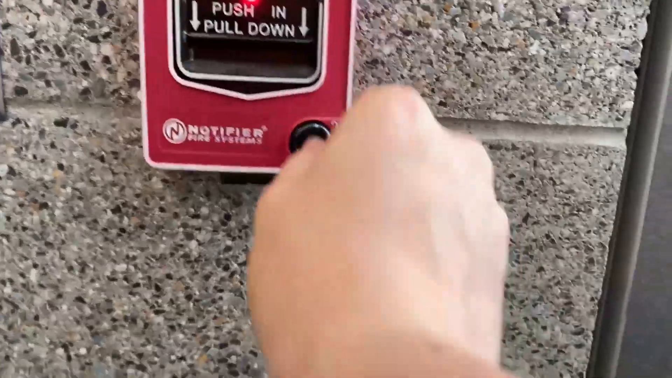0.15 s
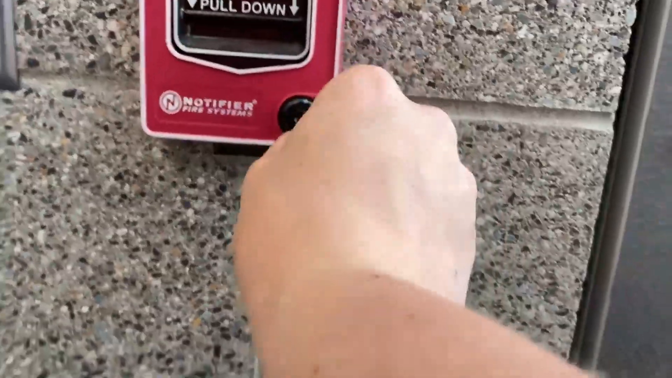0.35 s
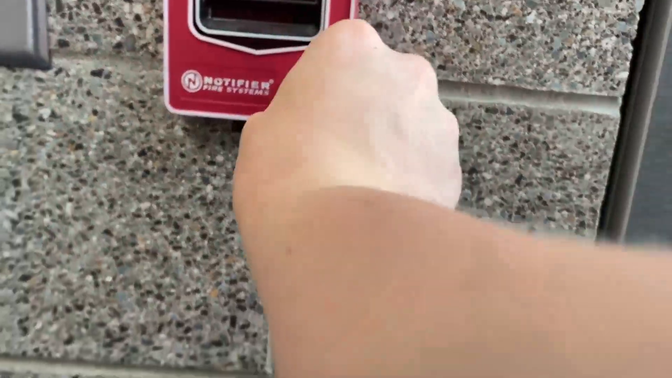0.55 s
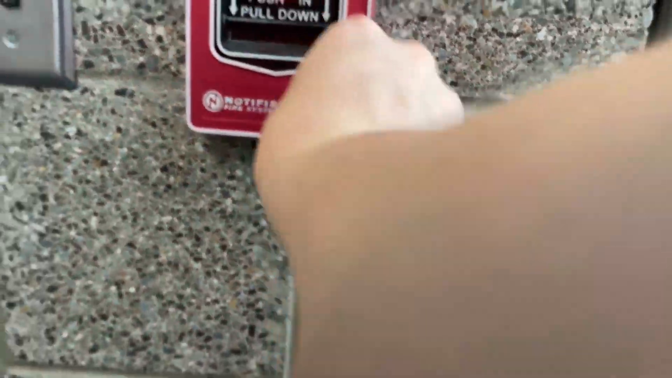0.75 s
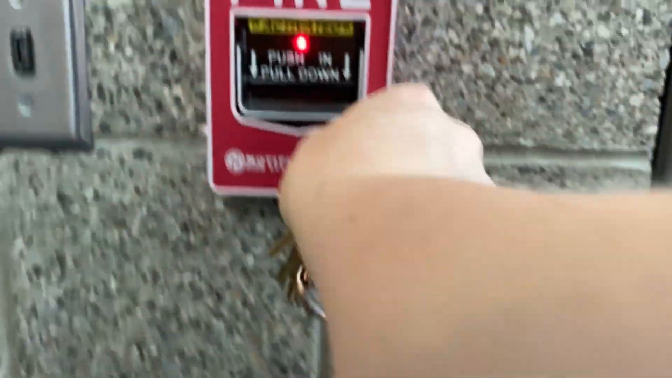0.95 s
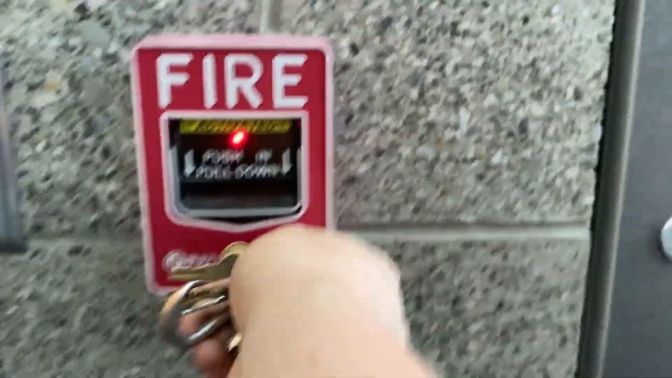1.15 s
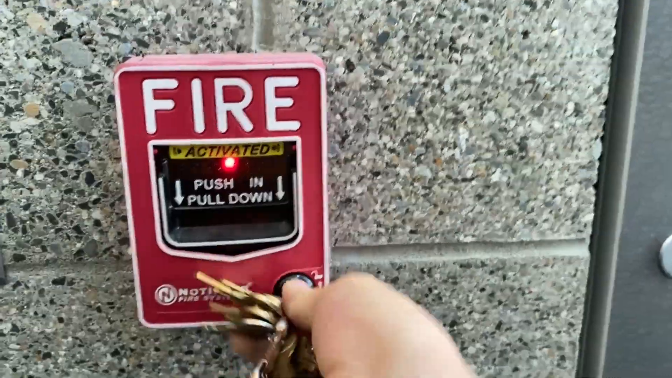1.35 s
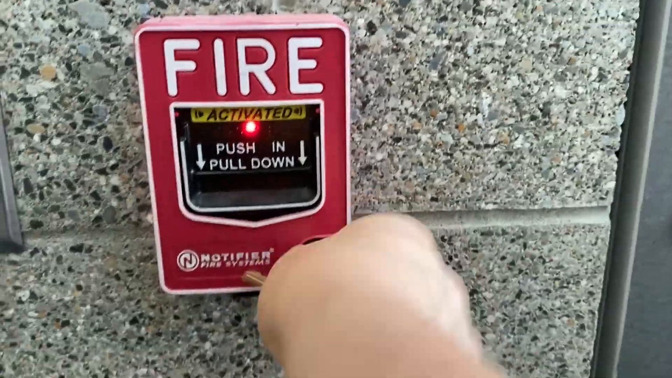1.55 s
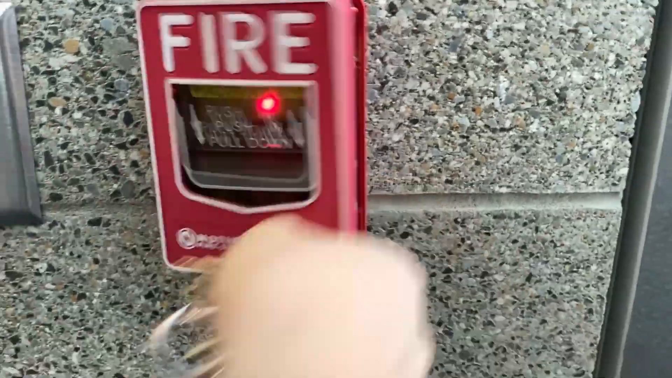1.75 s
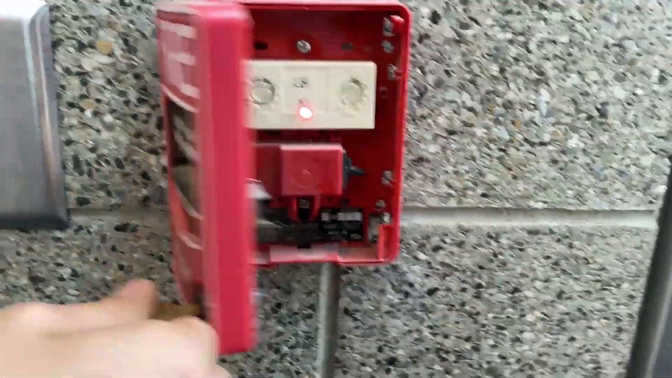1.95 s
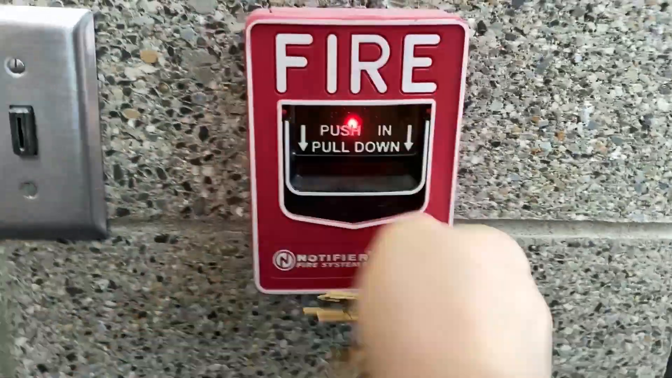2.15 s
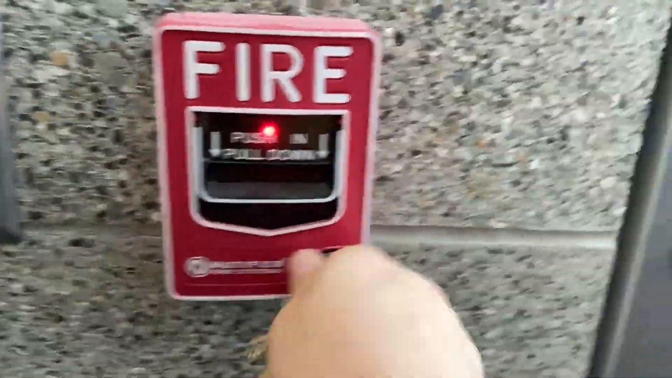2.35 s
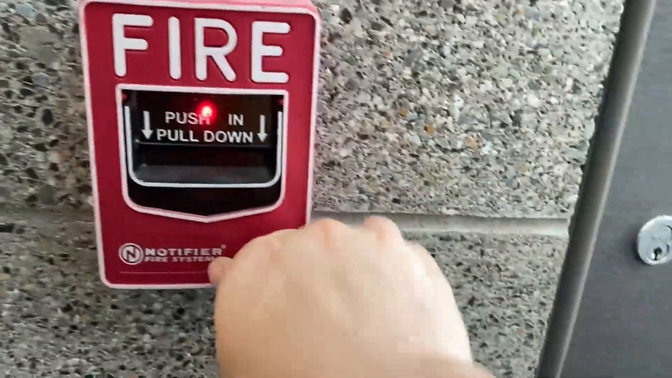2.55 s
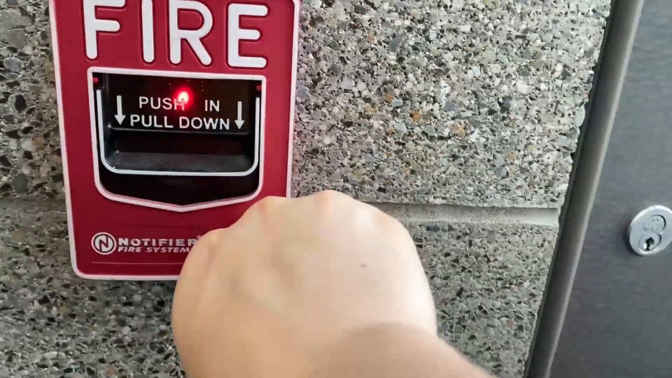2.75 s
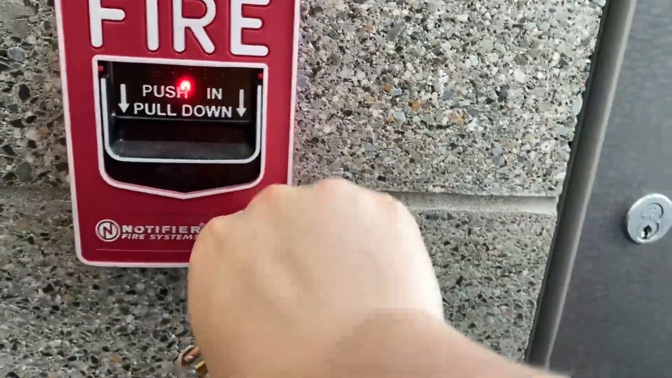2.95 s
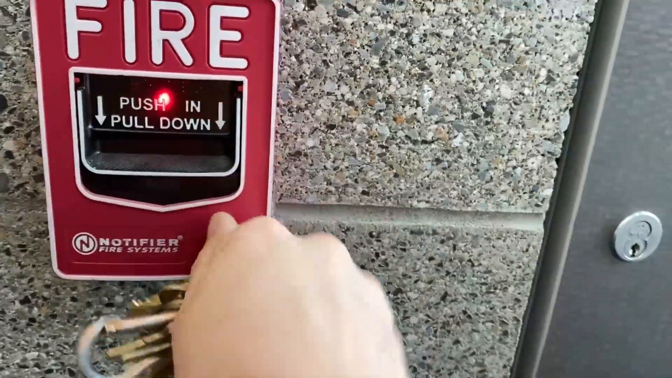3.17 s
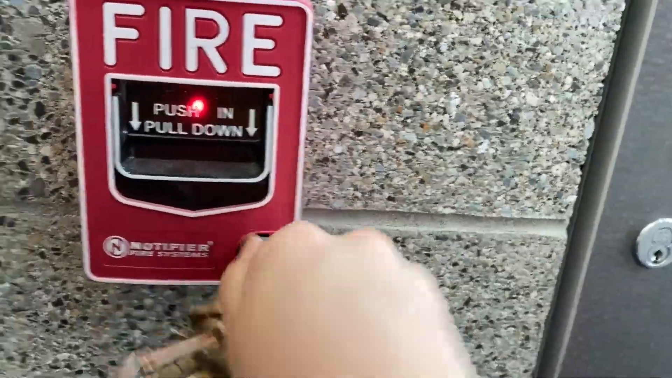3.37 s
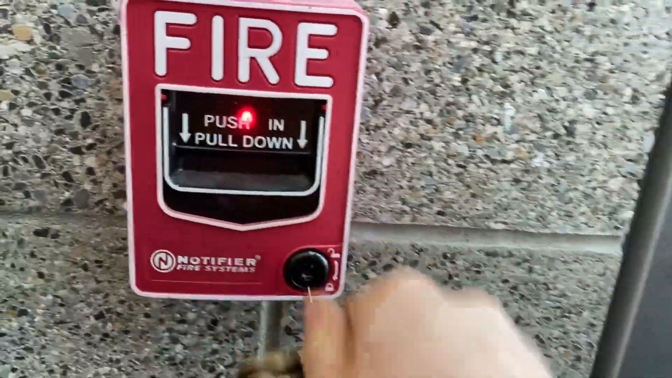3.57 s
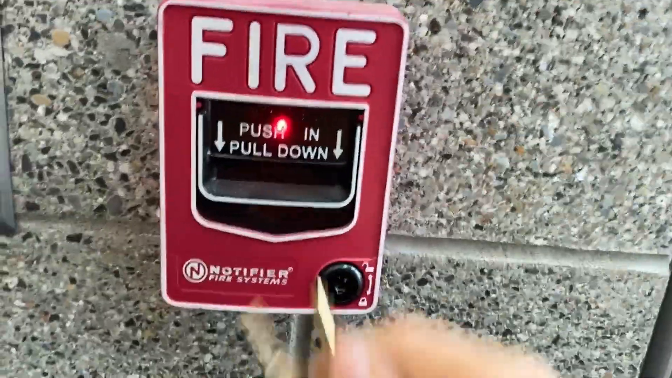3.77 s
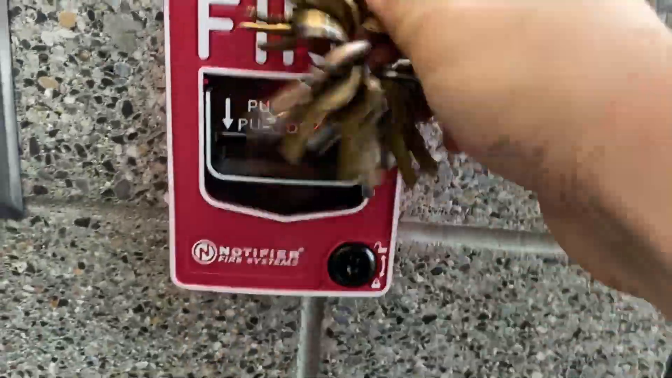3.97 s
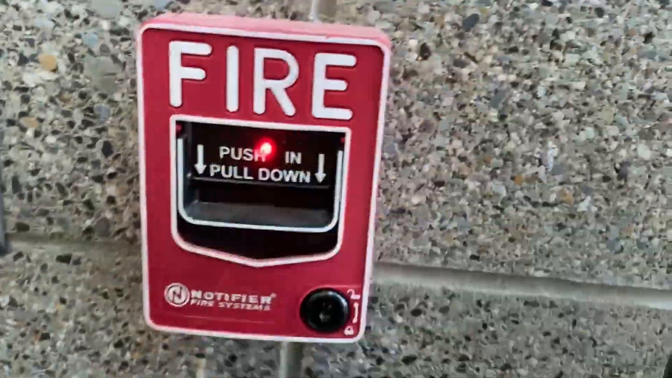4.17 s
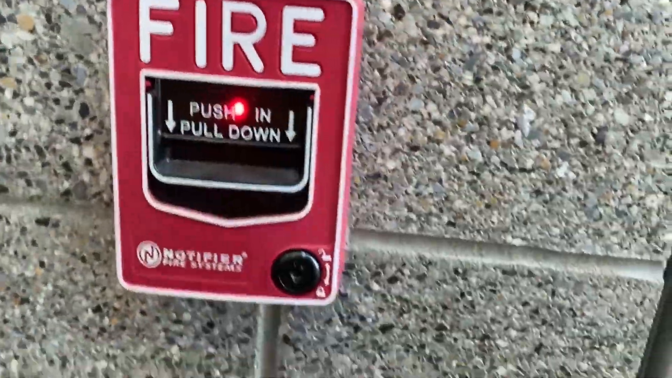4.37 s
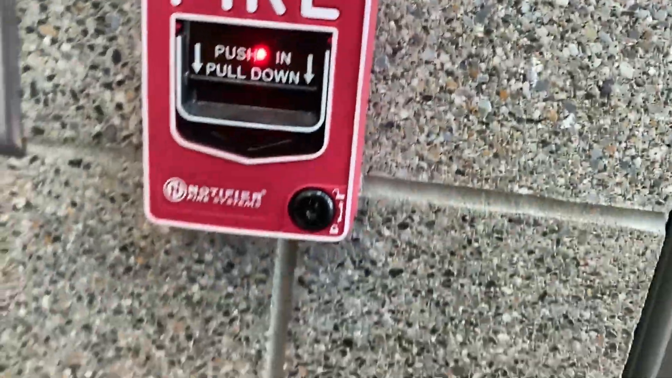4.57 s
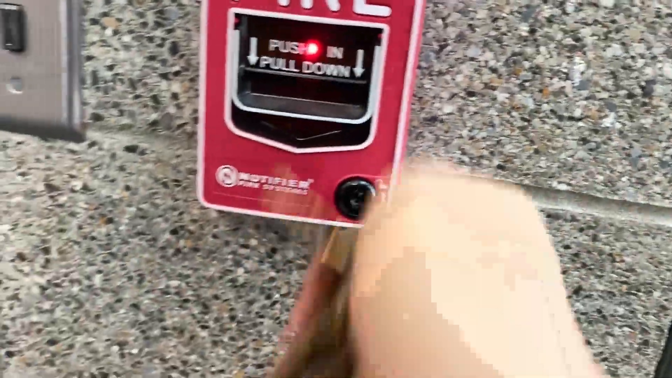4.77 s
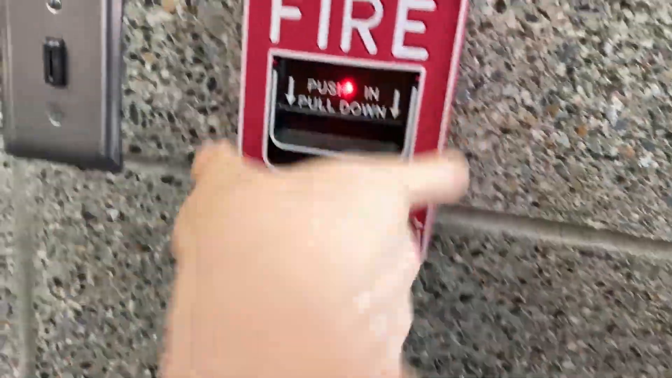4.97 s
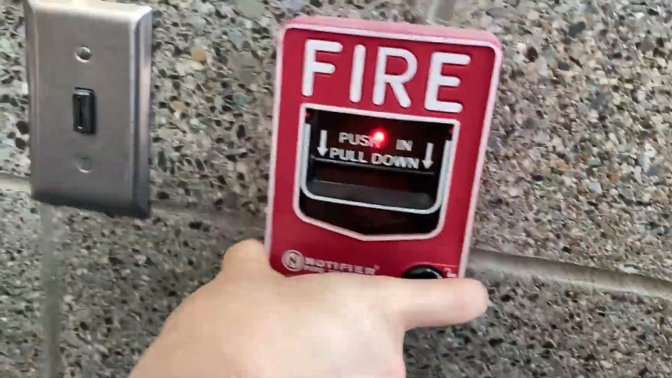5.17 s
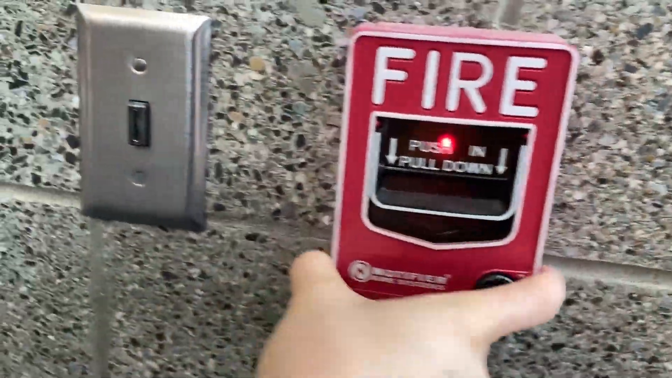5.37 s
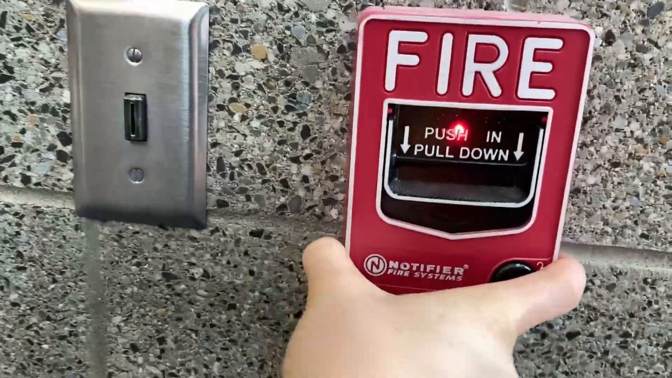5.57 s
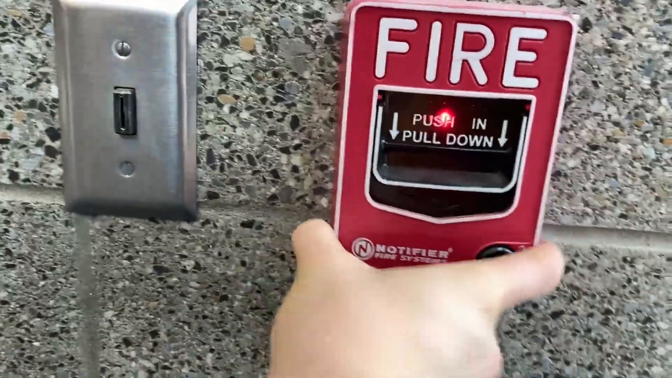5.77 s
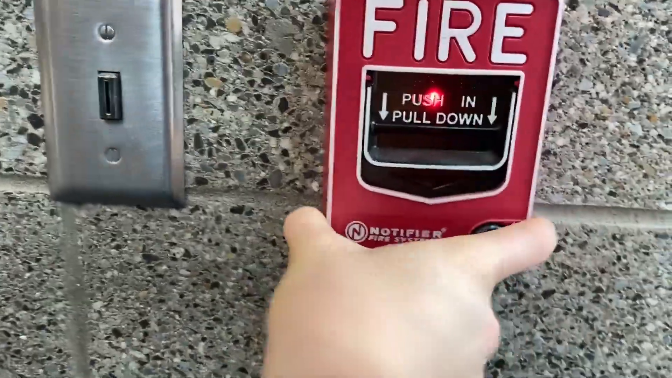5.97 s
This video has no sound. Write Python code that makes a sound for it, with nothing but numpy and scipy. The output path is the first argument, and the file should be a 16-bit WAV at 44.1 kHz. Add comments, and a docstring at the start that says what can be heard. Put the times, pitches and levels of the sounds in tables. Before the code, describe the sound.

A low, soft ventilation rumble with a faint mains hum runs throughout, in a hard-walled hallway whose echo is slight because the microphone is very close. From 0 to 0.6 s there are small hollow knocks on a plastic wall box, then a firm clack with a bright key clink near 0.7 s. From 1.1 to 1.6 s keys jingle and tick in the lock. A strong cluster of rattling clacks at 1.75 s opens the cover; a sharp snap with clinking at 2.12 s shuts it, with a smaller knock at 2.25 s. After a quieter gap, hard clacks come at 2.95 to 3.08 s, the loudest last, and a duller one at 3.4 s. Light loose jingling follows, with a bright double clack at 3.96 to 4.01 s, thinning by 4.4 s. At 5.07 s a brief palm slide squeaks softly, then sparse faint taps and ticks continue until 6 s.

```python
"""Ventilation rumbles throughout. After a few knocks on a small plastic wall box, a hand works a bunch of keys in its
lock, then opens and shuts its cover; at last the palm slides onto the cover and presses it. By contact mechanics each
touch is a short rattle of tiny impacts: it excites the box's modes, hollow near 1-2 kHz, and clinks among the keys
in the treble. A hard-walled hallway answers, by delays fed back; two microphone ports a little apart receive it."""
import sys
import numpy as np
from scipy import signal
from scipy.fft import rfft, irfft, next_fast_len
from scipy.io import wavfile

SR = 44100
rng = np.random.default_rng(int(sys.argv[2]) if len(sys.argv) > 2 else 0)


def bounce(signal):
    """Save signal as a 16-bit WAV file at the path given by the first command-line argument."""
    frames = np.transpose(np.atleast_2d(signal))
    limited = np.clip(frames, -1, 1)
    pcm = np.round(limited * 32767).astype(np.int16)
    wavfile.write(sys.argv[1], SR, pcm)


def natural_amplitude(level_db):
    """Convert a level in decibels to a linear amplitude factor, elementwise."""
    exponent = np.asarray(level_db, float) / 20
    return 10 ** exponent


N = 265305
LEAD = 1024   # samples from the start of a rattle to its height
HZ = np.fft.rfftfreq(N, 1 / SR)


def rms_one(x):
    """Normalisation: scale to rms 1."""
    return x / np.sqrt(np.mean(x ** 2) + 1e-20)


def at_hz(points, hz):
    """Interpolation: read a table on a log-frequency axis."""
    table_hz, values = np.array(points)[:, 0], np.array(points)[:, 1]
    return np.interp(np.log(hz + 1), np.log(table_hz + 1), values)


def colour(x, spectrum):
    """Spectral shaping: filter by a spectrum of mean power 1."""
    return irfft(rfft(x) * rms_one(natural_amplitude(at_hz(spectrum, HZ))), N)


def butter(x, order, hz, kind):
    """Butterworth filtering: a flat pass band."""
    return signal.sosfilt(signal.butter(order, hz, kind, fs=SR, output="sos"), x)


def through(x, response):
    """Linear systems: convolve each channel with an impulse response."""
    return signal.fftconvolve(x, response[None], axes=1)


def drift(rate_hz):
    """Random fluctuation: noise through two equal slow poles, scaled to rms 1."""
    r = np.exp(-2 * np.pi * rate_hz / SR)
    slow = signal.lfilter([1], [1, -2 * r, r * r], rng.standard_normal(N + SR))
    return rms_one(slow[SR:])


def impacts(count, spread_db):
    """Micro-impacts: dense, of uneven size and random sign; rms 1."""
    size_db = spread_db * np.minimum(rng.exponential(1, count), 5)
    return rms_one(rng.standard_normal(count) * natural_amplitude(size_db))


def rattle(swell_ms, fade_ms, spread, uneven_db):
    """Contact of rough bodies: impacts swell, then fade; a share of them is opposite in the two channels."""
    ms = (np.arange(5120) - LEAD) / SR * 1000
    swell = np.exp(-(ms / np.clip(swell_ms, .1, 18)) ** 2)
    fade = np.exp(-ms / max(fade_ms, .3))
    common = impacts(count=5120, spread_db=uneven_db)
    opposite = impacts(count=5120, spread_db=uneven_db) * [[1], [-1]]
    return np.where(ms < 0, swell, fade) * (common + spread * opposite)


def ringing(modes, strength_db, damping):
    """Modal superposition: impulse response of (f/Hz, width/Hz, level/dB) modes, of energy 1; damping scales width."""
    hz, width, db = np.transpose(modes)[:, :, None]
    t = np.arange(8192) / SR
    decay = np.exp(-np.pi * damping * width * t)
    rings = natural_amplitude(db + strength_db) * np.sqrt(width) * decay * np.sin(2 * np.pi * hz * t)
    return rms_one(rings.sum(axis=0)) / np.sqrt(8192)


def add(track, s, sound):
    """Superposition: mix in a sound; tracks have LEAD samples before time 0, so a rattle peaks at s."""
    i = round(s * SR)
    track[:, i:i + sound.shape[-1]] += sound[..., :track.shape[1] - i]


# spectrum of the moving air: f/Hz, relative level per Hz/dB
AIR = [(21, -46.5), (35, 3), (180, 1.5), (778, -20), (2170, -25.5), (12400, -46), (16000, -77)]
# correlation of the air noise in the two channels, clipped to -1..0.86: f/Hz, correlation
AIR_LIKENESS = [(60, 3.05), (380, -0.07), (2380, -2)]
# mains lines: f/Hz, level/dB before their drift and the balance
HUM = [(120, -58)]


def ventilation():
    """Turbulence noise: coloured and partly correlated, alike in the bass, with wavering mains lines."""
    mid, side = rfft(rng.standard_normal((2, N))) * natural_amplitude(at_hz(AIR, HZ))
    alike = np.clip(at_hz(AIR_LIKENESS, HZ), -1, .86)
    air = irfft(np.sqrt(1 + alike) * mid + np.sqrt(1 - alike) * side * [[1], [-1]], N)
    air = natural_amplitude(-45 + 0.4 * drift(2.9)) * rms_one(air)
    t = np.arange(N) / SR
    hum = 0
    for hz, db in HUM:
        level = np.sqrt(2) * natural_amplitude(db + 1.4 * drift(8.4))
        hum = hum + level * np.sin(2 * np.pi * hz * t + 0.54 * drift(3.0))
    return (air + hum) * natural_amplitude([[-.8], [.8]])   # the right is a little louder


def hallway(x):
    """Reverberation: sixteen feedback delays a side, duller on every round."""
    size = next_fast_len(N + SR)
    hz = np.fft.rfftfreq(size, 1 / SR)
    t60_s = 1 / (1 + hz / 5700)   # 1 s in the deep bass, half of it at 5700 Hz
    answer = np.zeros((2, len(hz)), complex)
    for k, lag_s in enumerate(rng.uniform(0.013, 0.063, size=32)):
        loop = natural_amplitude(-60 * lag_s / t60_s) * np.exp(-2j * np.pi * hz * lag_s)
        answer[k % 2] += (-1) ** (k // 2) * loop / (1 - loop)
    return irfft(answer * rfft(x, size), size)[:, :N]


# left port against right: f/Hz, phase/rad
PORT_PHASE = [(60, 0), (1800, 0), (2400, -1.1), (3800, 0), (5200, -.9), (6500, .1), (9300, 3.3),
              (12000, 6.2), (16000, 9.6)]
# left port against right: f/Hz, level/dB
PORT_BALANCE = [(60, 7.5), (180, 2.5), (550, -1), (1650, 3), (4970, -0.5), (15000, 8.5)]


def ports(x):
    """Two-point reception: the ports hear a near source with a phase and level step that depend on pitch."""
    half = natural_amplitude(at_hz(PORT_BALANCE, HZ) / 2) * np.exp(.5j * at_hz(PORT_PHASE, HZ))
    return irfft(rfft(x) * [half, 1 / half], N)


# range of the modes of the many keys: lowest f/Hz, highest f/Hz, narrowest width/Hz, widest width/Hz
KEYS = [6200, 15500, 130, 450]


def some_keys(count):
    """Free modes of metal bodies: whichever keys touch ring at pitches of their own."""
    low_hz, high_hz, narrow_hz, wide_hz = np.log(KEYS)
    modes = np.exp(rng.uniform([low_hz, narrow_hz, 0], [high_hz, wide_hz, 0], (count, 3)))
    return ringing(modes, rng.normal(0, 12.0, (count, 1)), damping=1)


# modes of the cover, also rung by the palm and the blows: f/Hz, width before damping/Hz, relative level/dB
BOX = [(608, 15, -2.5), (986, 46, -15), (1060, 37, -24.5), (1100, 47, -1.5), (1209, 18, 4.5),
       (1290, 192, 13), (1565, 70, 7.5), (1691, 40, 5), (1892, 58, -13), (1915, 300, 12), (2500, 510, 9),
       (3020, 170, 4), (3380, 210, 2), (4010, 200, 1), (4670, 65, -6.5)]
# spectrum of key scraping on key, also of the clinks: f/Hz, relative level per Hz/dB
CLINK = [(2000, -21), (3500, -10.5), (6000, -10.5), (9000, 5), (12000, 1.5), (15000, 6), (16500, -17)]


def fumbling(box_db, keys_db):
    """Friction noise: fingers keep brushing the cover; loose keys keep touching, a new pair each time."""
    rub = impacts(count=N, spread_db=2.5) * natural_amplitude(box_db + 2.5 * drift(28))
    brushed = signal.fftconvolve(rub, ringing(BOX, 0, damping=1.4))[:N]
    jiggle = impacts(count=N, spread_db=7.0) * natural_amplitude(keys_db + 4.5 * drift(25))
    pair = rng.integers(0, 12, N // 256 + 1).repeat(256)[:N]
    tinkle = sum(signal.fftconvolve(jiggle * (pair == k), some_keys(count=6))[:N] for k in range(12))
    return brushed + colour(jiggle, CLINK) + natural_amplitude(9.0) * tinkle


# the palm's slide onto the cover: start t/s, end t/s, level/dB before its drift
SLIDE = (5.066, 5.158, -42.5)
# modes that the palm leaves free: f/Hz
SLIDE_HZ = [580, 1180, 1740, 4700]


def slide():
    """Sliding friction: the palm drags along the cover with a wavering level and sets its modes ringing."""
    start_s, end_s, db = SLIDE
    t = np.arange(N) / SR
    stroke = (t > start_s) * np.clip((end_s - t) / 0.015, 0, 1)
    drag = impacts(count=N, spread_db=2.0) * natural_amplitude(db + 2.1 * drift(33.6)) * stroke
    modes_hz = np.array(BOX)[:, :1]
    favoured_db = sum(18.0 * np.exp(-(np.log2(modes_hz / hz) / 0.081) ** 2) for hz in SLIDE_HZ)
    tilt_db = -10.0 * np.log2(modes_hz / 1200)
    radiated = np.diff(ringing(BOX, favoured_db + tilt_db, damping=1.5))   # the slope holds little bass
    return signal.fftconvolve(drag, radiated / np.linalg.norm(radiated))[:N]


# key on key, at its height: t/s, level/dB, fade/ms
CLINKS = [(0.472, -16.5, 3.4), (0.655, -21.5, 8.3), (0.679, -17.5, 18), (0.696, -8, 1.5), (0.845, -37, 1.5),
          (0.901, -31.5, 2.5), (1.065, -47.5, 15), (1.098, -29, 11), (1.115, -20.5, 4), (1.247, -35.5, 3),
          (1.263, -25.5, 6.9), (1.301, -12.5, 16), (1.33, -40, 3), (1.359, -21, 2.2), (1.376, -30.5, 2.1),
          (1.403, -23, 12), (1.445, -18.5, 5.1), (1.457, -10.5, 5.1), (1.494, -20, 7.5), (1.565, -17, 9.7),
          (1.594, -24, 4), (1.631, -13.5, 2.5), (1.656, -29, 2.2), (1.672, -25.5, 2), (1.712, -30.5, 2.1),
          (1.739, -11.5, 3.5), (1.788, -17, 12), (1.874, -20, 2.6), (2.068, -29.5, 11), (2.118, -5.5, 12.3),
          (2.173, -22, 21), (2.232, -22, 2.8), (2.265, -21, 2.7), (2.404, -28, 15.4), (2.535, -32.5, 36),
          (2.583, -26, 3.2), (2.84, -27.5, 1.7), (2.947, -12, 1.9), (3, -15.5, 2.6), (3.078, -10, 5.7),
          (3.378, -31.5, 32), (3.399, -19, 5.8), (3.449, -28.5, 2), (3.513, -31, 7.7), (3.556, -37, 18),
          (3.587, -36, 35), (3.629, -33.5, 19), (3.663, -27.5, 8.4), (3.673, -32, 18), (3.707, -34, 5),
          (3.764, -32, 3.3), (3.777, -29.5, 14), (3.826, -34.5, 1.9), (3.841, -49.5, 1.6), (3.86, -32, 5.7),
          (3.928, -27, 4.4), (3.957, -20, 30), (3.975, -15.5, 24), (4.004, -24.5, 10), (4.048, -22, 16),
          (4.073, -30, 23), (4.102, -26.5, 2.9), (4.118, -32, 9.5), (4.131, -26, 7.3), (4.185, -32.5, 4.1),
          (4.212, -29, 8.5), (4.234, -35, 23), (4.265, -40, 5), (4.298, -43, 9), (4.341, -35, 9.3),
          (4.353, -19.5, 5.9), (4.365, -29.5, 14.3), (4.564, -41, 37), (4.763, -35, 5.5),
          (4.779, -29.5, 18), (4.805, -24, 0.91), (4.931, -29, 17), (4.954, -40, 33), (5.522, -25, 1.9),
          (5.536, -24.5, 2.2), (5.785, -36, 8.3), (5.875, -25, 3.7), (5.985, -30.5, 2.3)]
# single keys that hang free and ring on: t/s, f/Hz, starting amplitude/dB, 60 dB decay/s
RINGS = [(3.587, 9820, -27, .057), (3.671, 13900, -29, .09), (3.671, 3140, -43, .1),
         (3.776, 4990, -35, .05), (3.792, 13500, -41, .15), (3.858, 8150, -39, .2), (3.858, 12650, -39, .2),
         (3.858, 12050, -41, .22), (3.858, 3660, -44, .08), (4.074, 6560, -31, .045),
         (4.185, 13900, -38, .08), (4.185, 11950, -39, .07), (4.264, 11000, -36, .05),
         (4.048, 3700, -33, .04), (4.353, 12000, -46, .35)]


def keys(treble):
    """Metal impact: each clink is a bright rattle with some ring of the bunch; top treble comes and goes."""
    scratch, rings = np.zeros((2, 2, N + LEAD))
    for s, db, fade_ms in CLINKS:
        # metal on metal starts at once
        clink = natural_amplitude(db) * rattle(swell_ms=1.54, fade_ms=fade_ms, spread=0.12, uneven_db=3.6)
        add(scratch, s, clink)
        add(rings, s, natural_amplitude(-10.0) * through(clink, some_keys(count=9)))
    t = np.arange(16384) / SR
    for s, hz, db, t60_s in RINGS:
        envelope = natural_amplitude(db - 60 * t / t60_s) * (1 - np.exp(-t / 0.00033))
        swing_rad = np.cumsum(rng.normal(0, .05, len(t)))   # swinging, so the tone wavers
        add(rings, s + LEAD / SR, envelope * np.sin(2 * np.pi * hz * t + swing_rad))
    rings = butter(rings, 2, 2500, "high")
    bright = colour(scratch[:, LEAD:], CLINK) + rings[:, LEAD:]
    dull = butter(bright, 2, 8500, "low")
    return dull + np.clip(treble, 0, 1) * (bright - dull)


# thumps of the wall plate under some of the blows, each starting 8 ms ahead of t: t/s, level at the start/dB
THUMPS = [(0.69, -25), (1.762, -28.5), (2.129, -28), (3.008, -26), (3.088, -24.5), (3.426, -28),
          (3.967, -25), (4.015, -26), (5.883, -26)]
# modes of the wall plate: f/Hz, relative level/dB
WALL = [(80, -6.5), (160, -2.5), (190, -2)]
WALL_T60_S = 0.1039


def wall_plate():
    """Inertia: at the times listed a heavy plate is thumped, and its low modes start slowly."""
    plate = np.zeros((2, N + LEAD))
    modes = [(hz, np.log(1000) / (np.pi * WALL_T60_S), db) for hz, db in WALL]
    for s, db in THUMPS:
        sway = ringing(modes, rng.normal(0, 4.0, (len(modes), 1)), damping=1)
        sway *= 1 - np.exp(-np.arange(len(sway)) / (0.003 * SR))
        add(plate, s - .008 + LEAD / SR, natural_amplitude(db) * np.sqrt(2) * sway / abs(sway).max())
    return plate[:, LEAD:]


# blows on the box, at their height: t/s, level/dB, swell/ms (at most 18), fade/ms before scaling, loudest mode f/Hz
KNOCKS = [(0.032, -26.5, 2.4, 16.2, 1350), (0.146, -38, 18, 13, 1760), (0.229, -27, 5.6, 5.9, 1720),
          (0.306, -29.5, 0.83, 2.7, 1290), (0.321, -25, 9.9, 6.2, 1670), (0.346, -32.5, 18, 6.9, 1720),
          (0.417, -34.5, 2.3, 16, 1635), (0.474, -20, 1.2, 9.5, 1990), (.476, -20.5, 2.1, 2.5, 3945),
          (0.496, -22.5, 3, 9.4, 1720), (0.547, -37.5, 2.5, 57, 1244), (.66, -13, 4.7, 13.5, 1596),
          (0.686, -23, 14, 6.6, 1600), (0.698, -17.5, 23, 14, 1657), (0.901, -34, 0.86, 10, 1055),
          (1.115, -36.5, 4.1, 14.4, 1074), (1.255, -34.5, 0.91, 23, 1272), (1.288, -23, 1.3, 7, 1650),
          (1.309, -20, 7, 11, 1071), (1.359, -27, 12, 16, 1750), (1.415, -20, 6.7, 14.4, 1845),
          (1.46, -23, 5.5, 4.8, 1030), (1.495, -28.5, 10.5, 16, 1840), (1.557, -30, 9.6, 27, 1835),
          (1.636, -35, 2.8, 7, 990), (1.705, -30, 2, 18, 1840), (1.737, -13.5, 5.2, 6, 1264),
          (1.744, -13.5, 3, 12, 1510), (1.791, -13, 9.5, 11, 1498), (1.821, -24, 2, 4.6, 1154),
          (1.936, -35.5, 1, 5.9, 2050), (2.115, -16.5, 5.4, 13, 805), (2.125, -12.5, 5.3, 7.6, 1290),
          (2.232, -31.5, 0.84, 9.9, 1280), (2.254, -18, 1.3, 3.7, 1290), (2.268, -29.5, 1.5, 6, 3230),
          (2.27, -20.5, 5.2, 5.8, 1074), (2.284, -32.5, 3.5, 19, 1205), (2.577, -38.5, 19, 8.9, 1980),
          (2.761, -38.5, 1.4, 8.7, 1340), (2.841, -27.5, 1.8, 7.6, 646), (2.896, -36.5, 2.2, 2.4, 1100),
          (2.92, -24.5, 3, 5.8, 1100), (2.95, -19.5, 7.7, 10.6, 1054), (3.0, -17, 0.25, 7.4, 1015),
          (3.073, -9, 1.2, 2.6, 1010), (3.08, -13, 1, 7.4, 1060), (3.207, -37, 17, 11, 1030),
          (3.247, -34.5, 1.9, 21, 1030), (3.302, -32, 1, 4.5, 1100), (3.337, -37, 1.3, 23, 705),
          (3.373, -36, 2.7, 41, 1100), (3.407, -22.5, 12.4, 11.4, 1100), (3.425, -26.5, 6.5, 7.7, 1040),
          (3.502, -36.5, 5.4, 16, 1615), (3.542, -39, 3.1, 5.3, 1020), (3.958, -13, 0.74, 5.6, 1980),
          (3.978, -18, 9.5, 10.7, 990), (4.006, -14.5, 0.68, 9.7, 1625), (5.067, -37.5, 0.65, 3.6, 1740),
          (5.13, -35.5, 3, 11, 1170), (5.248, -51.5, 1.75, 9.4, 940), (5.315, -28.5, 1.8, 6.4, 1060),
          (5.437, -47.5, 5.5, 9, 760), (5.511, -39.5, 1.4, 24, 2070), (5.536, -29, 5.2, 5.8, 1100),
          (5.535, -29.5, 0.76, 3.5, 3790), (5.626, -45, 1.3, 10, 880), (5.692, -43, 0.72, 4.1, 1100),
          (5.776, -34.5, 5.7, 15.6, 1010), (5.793, -38, 4, 3.4, 2700), (5.883, -25.5, 6.4, 7.9, 1860),
          (5.981, -30, 1.8, 17, 850)]
# spectrum of the crack of a blow: f/Hz, relative level per Hz/dB
CRACK = [(1500, -30.5), (2500, 2.5), (4000, 2), (6500, 2), (9000, -8), (16000, -21)]
CRACK_DB, CRACK_PER_DB, MEDIUM_BLOW_DB = -12.5, 0.74, -25   # crack re a medium blow; harder blows crack more
SPOT_FAVOUR_DB = 20   # gain of the modes nearest the struck spot's pitch
SPOT_WIDTH_HZ, SPOT_DB = 80, 10   # the patch of cover under each blow, its level with that gain


def box():
    """Modal excitation: each blow rings the cover's modes and cracks above; some also thump the wall plate."""
    body, crack = np.zeros((2, 2, N + LEAD))
    for s, db, swell_ms, fade_ms, hz in KNOCKS:
        blow = rattle(swell_ms, 1.323 * fade_ms, spread=0.35, uneven_db=4.5)
        cover = np.array(BOX + [(hz, SPOT_WIDTH_HZ, SPOT_DB - SPOT_FAVOUR_DB)])
        octaves = np.log2(cover[:, :1] / hz)
        chance_db = rng.normal(0, 4.5, octaves.shape)
        favour_db = SPOT_FAVOUR_DB * np.exp(-(octaves / 0.047) ** 2)   # the spot struck favours one mode
        strength_db = chance_db - 2.56 * octaves ** 2 + favour_db
        quick = ringing(cover, strength_db, damping=1.11)
        lasting = natural_amplitude(-14.0) * ringing(cover, strength_db, damping=0.4)
        add(body, s - .0015, natural_amplitude(db) * through(blow, quick + lasting))
        crack_db = db + CRACK_DB + CRACK_PER_DB * (db - MEDIUM_BLOW_DB)
        add(crack, s, natural_amplitude(crack_db) * rattle(swell_ms, 0.83 * fade_ms, spread=0.52, uneven_db=5.5))
    body = butter(body, 3, 520, "high")   # a small cover radiates no bass
    return body[:, LEAD:] + wall_plate() + colour(crack[:, LEAD:], CRACK)


# steady fumbling: t/s, rubbing level on the box/dB, jiggle level of the keys/dB, the hand's pan left re right/dB,
# share of the keys' top treble (0-1)
FUMBLE = [(0, -53.5, -101, -5.5, 0.8), (.6, -50.5, -84, -7, 0.17), (1.2, -52, -75, -4.5, 1),
          (1.3, -59, -50, -3, 0.28), (1.7, -41, -54.5, -6, 1), (2.0, -45.5, -71, -7, 0.32),
          (3.3, -54.5, -68, -3, 0.59), (3.5, -50.5, -54, -5, 1), (3.751, -66, -67, -7.5, 0.86),
          (4.1, -52.5, -58.5, -6, 1), (4.45, -56.5, -67.5, -5.5, 0.94), (4.68, -66, -83.5, -3, 0.67),
          (4.9, -60, -66, -7, 0.42), (5.2, -60.5, -82, -7.5, 0.2)]


def scene():
    """Direct and reverberant field: near sounds pass the ports directly and again by way of the hallway."""
    s, *columns = np.transpose(FUMBLE)
    box_db, keys_db, pan_db, treble = (np.interp(np.arange(N) / SR, s, c) for c in columns)
    near = box() + slide() + keys(treble) + fumbling(box_db, keys_db)
    direct = near * natural_amplitude(pan_db * [[.5], [-.5]])
    reverberant = natural_amplitude(-32) * hallway(near.mean(axis=0))
    return ports(direct + reverberant) + ventilation()


def low_pass(x):
    """Removes everything above the highest recorded frequency."""
    return signal.sosfilt(signal.butter(12, 17150, fs=SR, output="sos"), x)


def record(dry):
    """Saturation and band limiting: peaks are rounded, deep bass and the top are cut."""
    rounded = 1.025 * np.tanh(dry / 1.194)
    lean = butter(rounded, 2, 45.0, "high")
    cut = signal.sosfilt(signal.cheby2(10, 60, 17200, fs=SR, output="sos"), lean)
    return low_pass(cut)


dry = scene()
out = record(dry)
bounce(out)
```